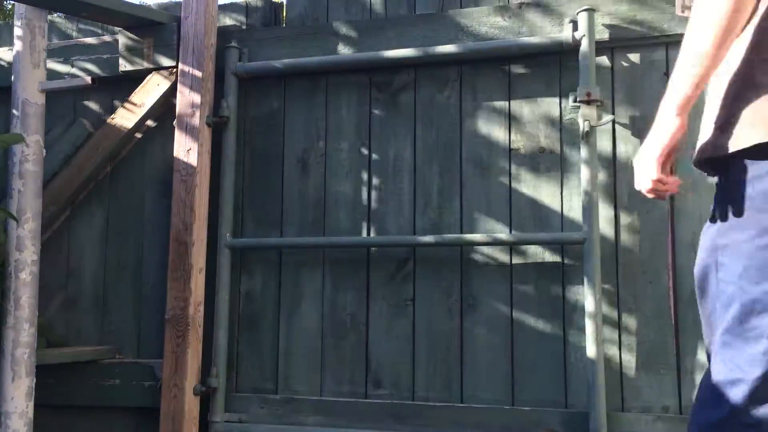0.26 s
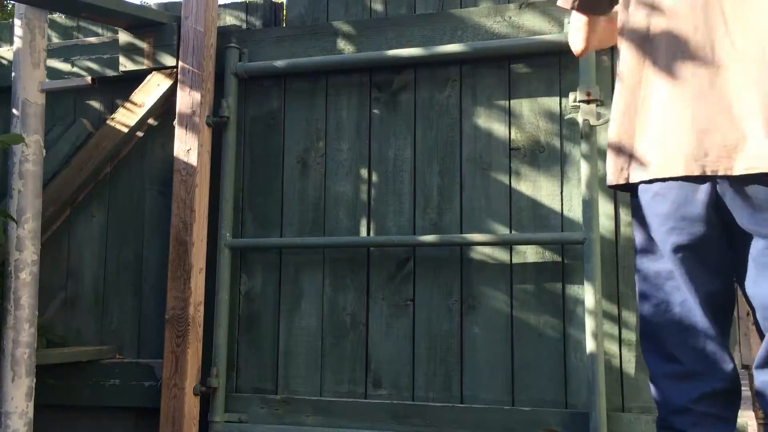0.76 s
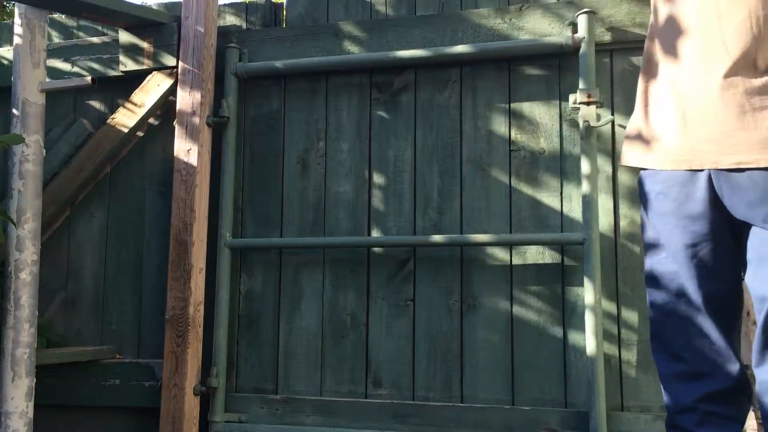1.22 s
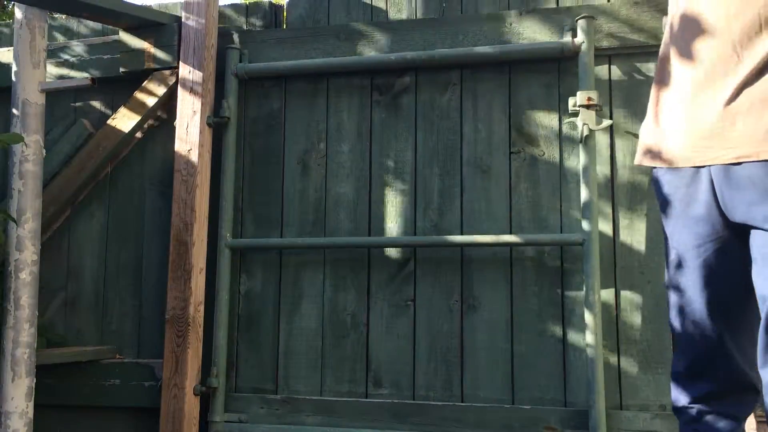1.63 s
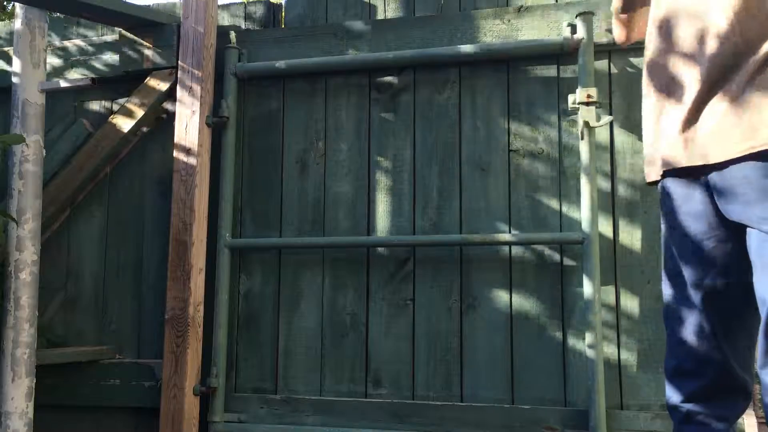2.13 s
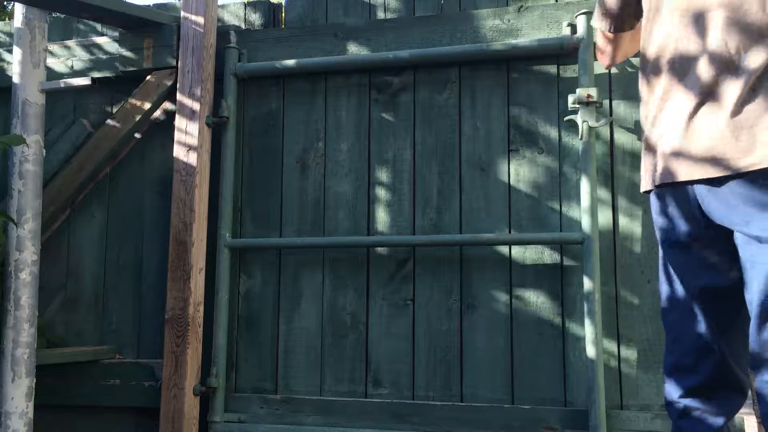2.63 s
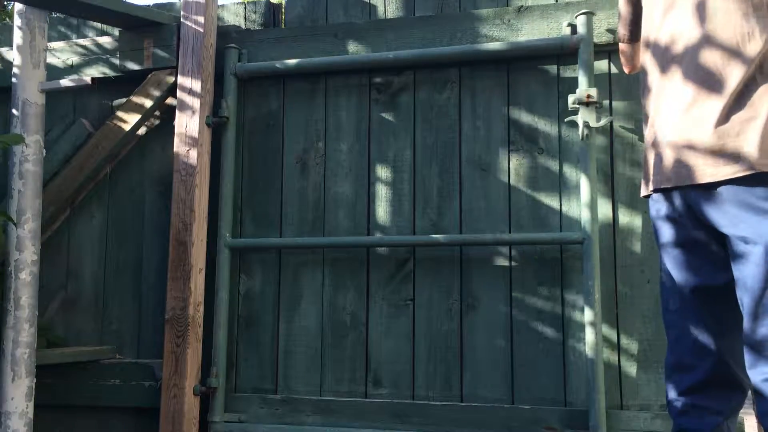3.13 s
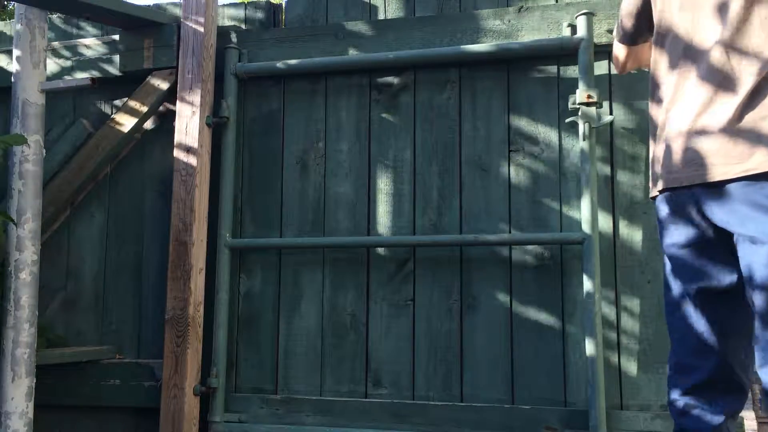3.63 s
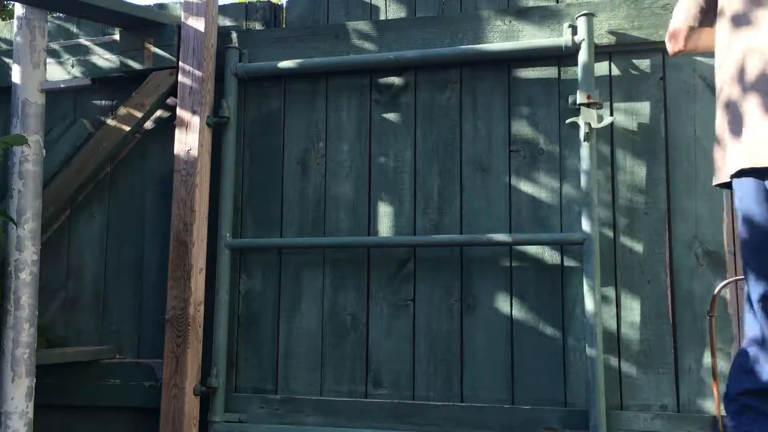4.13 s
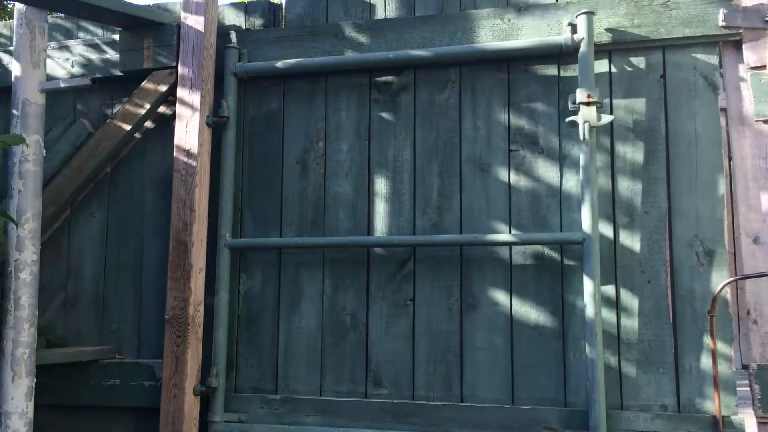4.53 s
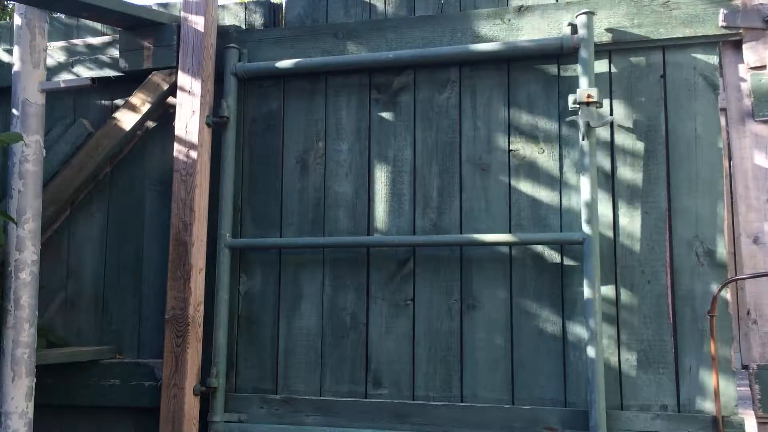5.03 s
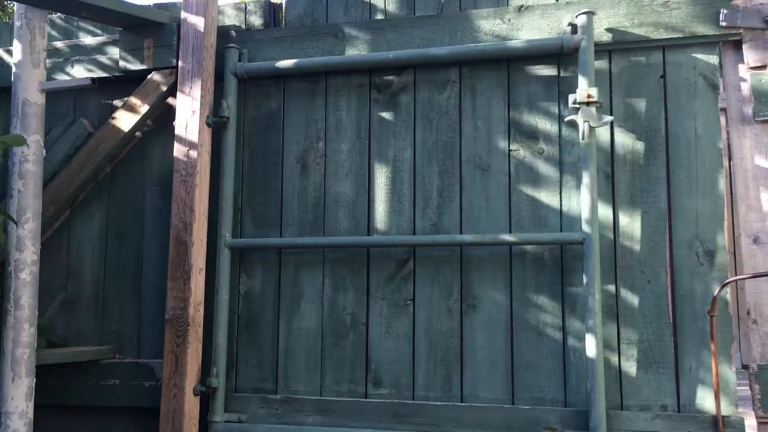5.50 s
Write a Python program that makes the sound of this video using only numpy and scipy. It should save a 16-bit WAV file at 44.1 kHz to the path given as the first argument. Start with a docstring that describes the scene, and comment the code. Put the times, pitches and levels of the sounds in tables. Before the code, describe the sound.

Metal latch parts clank and ring while a tube-framed wooden gate knocks, scrapes and squeaks in bursts, over faint distant traffic hum.

```python
"""First a low far hum and a soft thud, then a faint hinge squeak and a gathering run of knocks.
Outdoors in a fenced yard, a wooden gate on a steel tube frame is handled: shaped noise makes its knocks,
scrapes, screech and thuds; decaying sines ring its latch bar and catch plate until a touch damps them;
wavering harmonic tones squeak. The fences answer; far traffic and leaves hum behind, and a faint far
bird whistles near the end. The microphone chain rolls off both ends of the range."""
import sys
import numpy as np
from scipy import signal
from scipy.fft import rfft, irfft
from scipy.io import wavfile
from scipy.ndimage import map_coordinates

SR = 44100
rng = np.random.default_rng(int(sys.argv[2]) if len(sys.argv) > 2 else 0)


def master_out(mix):
    """Clip the mix to full scale and print it as 16-bit PCM to the path in sys.argv[1]."""
    frames = np.transpose(np.atleast_2d(mix))
    ceiling = np.clip(frames, -1, 1)
    pcm = np.round(ceiling * 32767).astype(np.int16)
    wavfile.write(sys.argv[1], SR, pcm)


def volts_from_decibels(level):
    """Turn decibel levels (scalar or array-like) into linear amplitude factors."""
    exponent = np.asarray(level, float) / 20
    return 10 ** exponent


N = 253969

# Spectra are relative shapes unless said: pitch_hz, level_db.
# Resonances: pitch_hz, width_hz, added_db (height added on top of the spectrum).

# far traffic and leaves: pitch_hz, level_db
AIR_SPECTRUM = [(15, -42), (25, -1), (70, -3.5), (166, -8), (196, -20.5), (250, -9.5), (278, -27),
                (453, -18), (491, -17), (2490, -32.5), (4170, -38), (4520, -37), (14500, -52), (16200, -39)]
AIR_DB = -48
# faint far whistle: time_s, pitch_hz, level_db
BIRD_WHISTLE = [(5.49, 3200, -85), (5.51, 3500, -72), (5.53, 4050, -69), (5.59, 4100, -71),
                (5.62, 4100, -85)]
# the fences' answer: pitch_hz, t60_s
YARD_DECAY = [(300, .35), (2000, 0.33), (10000, 0.24)]
# low boom of post and boards: pitch_hz, level_db
POST_SPECTRUM = [(24, -41), (40, -16), (56, -4), (103, -5), (189, -3.5), (233, -8.5), (269, -10.5),
                 (350, -14.5), (460, -35.5), (770, -120)]
# boards and post shaken: fullest_s, level_db, t60_s
SHAKES = [(.005, -48, 0.47), (.14, -55, .3), (.21, -33.5, 1), (.3, -36, .3), (0.339, -21.5, 0.069),
          (.4, -23.5, 0.37), (0.688, -28.5, 0.41), (1.12, -47, 0.52), (1.382, -31.5, 0.4),
          (1.53, -35.5, 0.39), (1.616, -24.5, 0.54), (1.92, -45, 0.75), (2.34, -38, 0.23),
          (2.63, -42.5, 0.4), (2.92, -32, 0.19), (3.0, -33, 0.34), (3.43, -43, .5), (3.755, -36, 0.32),
          (3.95, -46, .4), (4.06, -28.5, 0.27), (4.23, -41, 0.32), (4.38, -45.5, 1), (5.4, -38.5, 0.18),
          (5.66, -52, .9)]
THUD_RISE_DB_PER_S, RUMBLE_DB = 334, -52
# resonances of the whole gate: pitch_hz, width_hz, added_db
GATE_MODES = [(111.8, 13.4, -3), (179.2, 9.3, 1.5), (401.4, 33, 4), (461.2, 14, 4), (605, 24, -13),
              (693, 90, -9.5), (818, 39, -4), (906, 32, 4.5), (1013.6, 52, -1.5), (1113, 78, 1.5),
              (1220, 83, 7.5), (1319, 21.5, 10), (1453, 43, 2), (1566, 29, 4.5), (1695, 43, 4.5),
              (1856, 24, -4.5), (1970, 30, -9.5), (2371, 160, 10), (3037, 65, 13.5)]
# hinge squeaks: start_s, length_s, start_pitch_hz, level_db, second_harmonic_db (over the first)
HINGE_SQUEAKS = [(.085, .035, 1780, -57, -4), (.93, .055, 2260, -47, -12), (2.495, .04, 945, -43, -20),
                 (4.336, .062, 940, -32, -5), (4.39, .045, 900, -37, -14), (4.452, .04, 2070, -42, -25),
                 (4.83, .035, 915, -42, -5), (4.908, .03, 935, -36, -11), (4.94, .03, 905, -45, -14)]
SAG_HZ_PER_S = 900
# steel rubbing along the tube: time_s, level_db
SCREECH_LEVEL = [(0.2, -69), (0.245, -39.5), (0.32, -42), (0.382, -22.5), (0.4, -53), (0.43, -46),
                 (0.5, -76)]
# narrow modes of the tube: pitch_hz, width_hz, added_db
TUBE_MODES = [(3910, 45, 12), (4590, 45, 15), (5330, 45, 16), (6090, 45, 20), (6690, 45, 12),
              (6990, 55, 27), (7868, 55, 29), (8810, 45, 21), (9700, 50, 18), (10800, 45, 23),
              (11900, 45, 18), (12700, 45, 14), (13000, 60, 21), (14100, 50, 16), (15290, 45, 18)]
# catch plate set ringing: start_s, level_db (before trim), free_s until damped, most_excited_hz
CATCH_STRIKES = [(2.345, -17, 0.029, 10420), (2.606, -55, 0.027, 7770), (2.898, -16, 0.07, 10420),
                 (3.026, -38, 0.076, 7770), (3.54, -37, 0.065, 8620), (3.74, -16, 0.12, 6450),
                 (3.739, -11, 0.096, 10420), (4.139, -41, 0.18, 7360), (4.722, -50, 0.12, 7600),
                 (5.207, -58, .07, 9570)]
# modes of the catch plate: pitch_hz, level_db, t60_s
PLATE_MODES = [(6450, 0, .35), (7600, 0, .5), (7770, 0, .3), (8620, 0, .3), (9570, 0, .2), (10420, 0, .18)]
# latch bar set ringing: start_s, level_db (before trim), free_s until damped, most_excited_hz,
# loss_db_per_octave away from it
LATCH_STRIKES = [(.524, -40, 0.14, 8600, -8.5), (.695, -21.5, 0.61, 4100, 1), (1.336, -32, 0.14, 6200, 27),
                 (1.482, -12, 0.083, 2940, 44), (1.654, -11, 0.095, 6200, 3), (1.754, -17.5, 0.1, 4100, 9),
                 (1.918, -17.5, 0.22, 8000, -3.5), (2.167, -13.5, 0.15, 5000, 8),
                 (4.245, -30, 0.24, 5690, 12)]
# modes of the latch bar: pitch_hz, level_db, t60_s
LATCH_MODES = [(1325, -8, .28), (1426, -4, .3), (1976, -11, .2), (2360, -3, .1), (2935, -7, .25),
               (3955, -11, .32), (4101, -4, .85), (4237, -13, .3), (4298, 0, .17), (4823, -27, .5),
               (5690, -8, .75), (6186, -5, .38), (6438, -18, .26), (7343, -20, .25), (7916, -18, .22),
               (8622, -7, .3), (9220, -13, .18), (9990, -26, .25), (10804, -1, .24), (11120, -15, .2),
               (11460, -9, .13), (11620, -9, .15), (11890, -14, .14), (12360, -9, .1), (13380, -14, .09),
               (13790, -16, .15), (14990, -18, .2)]
# steel tube frame under contact: pitch_hz, level_db
FRAME_SPECTRUM = [(100, -57), (450, -23.5), (650, -2), (900, 5.5), (1250, 0.5), (1600, -0.5), (2000, 3.5),
                  (2600, -22.5), (8000, -104)]
# wooden boards: pitch_hz, level_db
BOARD_SPECTRUM = [(200, -21.5), (300, -0.5), (420, 4), (550, 6), (750, 1.5), (1100, -26), (4000, -87.5)]
# thin bars: pitch_hz, level_db
BAR_SPECTRUM = [(400, -85.5), (1200, -9.5), (1600, 0.5), (1900, -0.5), (2400, -5.5), (2800, -6),
                (3800, -13.5), (5500, -18), (9000, -34), (15000, -66)]
# bright steel edges: pitch_hz, level_db
EDGE_SPECTRUM = [(2060, -19.5), (3500, 2), (9140, -5), (10100, -8), (11400, -12.5), (13700, -13),
                 (15800, -20), (16200, -47)]
# Levels of knocks and clanks are nominal: contacts() trims each layer.
# the frame struck: start_s, frame_level_db, boards_over_frame_db, edge_over_frame_db, frame_t60_s
FRAME_KNOCKS = [(0.087, -48.5, -17, -14, 0.49), (0.196, -30.5, -0.5, -24, 0.27),
                (.216, -28.5, -9, -19, 0.35), (0.283, -22, -8, -8, 0.15), (0.326, -15.5, -6.5, -11, 0.25),
                (.35, -21.5, -7, -21, .23), (0.692, -16.5, -20, -9.5, 0.15), (1.214, -35.5, -19, -34, .067),
                (1.256, -35.5, -28, -37, 0.1), (1.302, -33, -24, -39, 0.19), (1.557, -23.5, -4, -16, 0.094),
                (1.613, -15.5, -2.5, -27, .075), (1.754, -11, -22, -8.5, 0.16),
                (1.864, -23.5, -13, -17, 0.15), (2.3, -9.5, -16, -19.5, .16), (2.336, -11, -39, -20, 0.16),
                (2.605, -30, -1.5, -13, 0.21), (2.702, -38.5, -3, -21.5, 0.26),
                (2.806, -27.5, -4, -22, 0.12), (2.854, -30, -6, -23, 0.19), (2.896, -6.5, -10, -14, 0.077),
                (2.971, -12, -8.5, -26, 0.13), (3.024, -9, -20, -17.5, 0.089),
                (3.265, -22.5, -21, -16.5, 0.16), (3.309, -12.5, -12, -17.5, 0.11),
                (3.332, -15.5, -16, -18, 0.37), (3.404, -13, -12, -27, 0.13), (3.516, -16, -16, -32, 0.062),
                (3.537, -17.5, -12, -24, .2), (3.607, -21.5, -20.5, -23, 0.17),
                (3.641, -22, -5.5, -35, 0.053), (3.709, -23, -25.5, -14.5, 0.25),
                (3.735, -13.5, -15.5, -6.5, 0.093), (3.742, -16, -17.5, -11, 0.28),
                (3.813, -17.5, -16, -7.5, 0.066), (3.851, -16.5, -21, -19, 0.054),
                (3.919, -32.5, -23, -20, 0.092), (3.934, -19, -10.5, -39, .16),
                (4.036, -11.5, -4.5, -34.5, 0.078), (4.139, -26, -8, -15.5, 0.14),
                (4.556, -17.5, -19, -41, 0.049), (4.661, -45, -23, -20, .092),
                (4.72, -26.5, -14.5, -15, 0.15), (5.317, -25.5, -10, -9.5, 0.061),
                (5.357, -30.5, -0.5, -3, 0.06), (5.39, -32, -1.5, -20, 0.088),
                (5.641, -43.5, -11, -25, .17)]
BARS_OVER_FRAME_DB, BARS_FOLLOW_EDGE = -8, 0.21  # a brighter knock wakes the thin bars more
# the thin bars struck: start_s, bars_level_db, frame_over_bars_db, edge_over_bars_db, frame_t60_s
BAR_CLANKS = [(0.252, -31, 4, -3.5, 0.086), (0.418, -25, -16, -5.5, 0.09), (0.516, -25.5, 2, -27, 0.097),
              (.526, -33, -2, -3.5, 0.11), (1.336, -26, 1, -8.5, 0.097), (1.398, -28, -11, -17, .29),
              (1.485, -25.5, -3, -21, 0.067), (1.519, -28, -5, -16, 0.21), (1.65, -16.5, -7, -12, 0.089),
              (1.658, -15.5, -3, -1.3, .12), (1.916, -22.5, 2, 2.5, 0.19), (2.146, -22, -10, -12, 0.26),
              (2.167, -17.5, -2.5, -9.5, 0.13), (2.257, -29, -15, -25, .06), (2.366, -19.5, 3, -8.5, 0.032),
              (4.24, -27.5, -3, -19, 0.17), (4.392, -34.5, 5, -40, 0.12), (5.012, -48, 1, -6, 0.045),
              (5.206, -37, 1, -6.5, 0.1)]
BOARDS_OVER_BARS_DB = -18.5
# tiny dry clicks: start_s, level_db (before trim)
DRY_TICKS = [(0.636, -33.5), (0.948, -40), (1.0037, -37.5), (1.5287, -24), (2.5905, -55), (4.834, -41),
             (5.1344, -50), (5.499, -42)]
# a bar slides in before it lands: start_s, landing_s, frame_level_db, bars_level_db, edge_level_db
BAR_SLIDES = [(0.511, 0.533, -33, -25, -55), (0.652, 0.686, -38.5, -35, -45),
              (1.735, 1.753, -29.5, -26.5, -36), (1.906, 1.918, -25, -22, -53),
              (3.254, 3.267, -26, -43, -39), (4.024, 4.04, -23, -38, -60), (4.233, 4.255, -29.5, -33, -59)]
# dragging strokes: start_s, hardest_s, end_s, frame_level_db, edge_over_frame_db
DRAG_STROKES = [(.2, 0.402, 0.42, -33, -10), (1.34, 1.378, 1.524, -29.5, -25), (1.39, 1.52, 1.72, -31, -22),
                (2.156, 2.257, 2.34, -29.5, -29), (3.302, 3.37, 3.33, -36, -7),
                (3.48, 3.568, 3.74, -55, -13), (3.73, 3.81, 4.15, -44.5, -6), (4.15, 4.25, 4.4, -55, -7.5),
                (5.276, 5.359, 5.54, -47.5, 1)]
STROKE_ENDS_DB = -32  # either end of a stroke against its hardest moment
# microphone chain, absolute gain: pitch_hz, gain_db
MICROPHONE = [(25, -10), (55, -1), (15200, 1), (15600, -17), (16300, -16), (16600, -78)]


def unit(x):
    """x at rms 1."""
    return x / np.sqrt(np.mean(x ** 2) + 1e-20)


def along(points, hz):
    """Reads a (pitch_hz, value) table on a log pitch axis."""
    f, v = np.transpose(points)
    return np.interp(np.log(hz + 1), np.log(f + 1), v)


def gains(rows):
    """A gain per sample for each dB column, silent outside the table."""
    s, *cols = np.transpose(rows)
    t = np.arange(N) / SR
    return np.array([volts_from_decibels(np.interp(t, s, c, -150, -150)) for c in cols])


def wobble(rate):
    """A smooth random curve, rate knots a second."""
    knots = rng.standard_normal(int(N * rate / SR) + 4)
    return map_coordinates(knots, [np.arange(N) * rate / SR])


def coloured(x, spectrum, peaks=(), keep_level=False):
    """x through a causal minimum-phase filter, of unit energy unless keep_level: spectrum plus resonances."""
    f = np.fft.rfftfreq(16384, 1 / SR)
    lift = sum(volts_from_decibels(db) / (1 + (2 * (f - centre) / width) ** 2) for centre, width, db in peaks)
    magnitude = volts_from_decibels(along(spectrum, f)) * (1 + lift)
    cepstrum = irfft(np.log(np.maximum(magnitude, 1e-5)))
    cepstrum[1:len(f) - 1] *= 2  # folding the cepstrum makes the phase minimal
    cepstrum[len(f):] = 0
    response = irfft(np.exp(rfft(cepstrum)))[:len(f)]
    if not keep_level:
        response = response / np.linalg.norm(response)
    return signal.fftconvolve(x, response)[:N]


def grit(spiky):
    """Many tiny contacts: noise whose size changes every few milliseconds."""
    return unit(rng.standard_normal(N) * volts_from_decibels(spiky * wobble(350)))


def air():
    """Far traffic and leaves: shaped noise, slowly wavering in level."""
    level_db = AIR_DB + wobble(1.92) + 1.8 * wobble(6.9)
    return volts_from_decibels(level_db) * coloured(rng.standard_normal(N), AIR_SPECTRUM)


def bird():
    """A faint far whistle, one trembling sine that rises then holds."""
    s, hz, db = np.transpose(BIRD_WHISTLE)
    pitch_hz = np.interp(np.arange(N) / SR, s, hz) + 40 * wobble(150)
    phase = 2 * np.pi * np.cumsum(pitch_hz) / SR
    level = gains(np.transpose([s, db]))[0] * volts_from_decibels(4 * wobble(80))
    return level * np.sin(phase)


def yard(x):
    """The fences answer with a noise tail, each frequency dying at its own speed."""
    hz, t, z = signal.stft(rng.standard_normal(SR // 2), SR, nperseg=256)
    decay = volts_from_decibels(-60 * t / along(YARD_DECAY, hz)[:, None])
    tail = signal.istft(z * decay, SR, nperseg=256)[1]
    late = np.pad(x, (300, 0))  # the answer waits 300 samples
    return signal.fftconvolve(late, tail / np.linalg.norm(tail))[:N]


def thuds():
    """Low booms of the shaken gate, swelling fast and dying away, over a steady far rumble."""
    t = np.arange(0, N, 32) / SR
    power = volts_from_decibels(RUMBLE_DB) ** 2
    for fullest, db, t60 in SHAKES:
        fall_db = np.maximum(THUD_RISE_DB_PER_S * (fullest - t), 60 * (t - fullest) / t60)
        power = power + volts_from_decibels(db - fall_db) ** 2
    shake = np.interp(np.arange(N) / SR, t, np.sqrt(power))
    return coloured(shake * grit(1.3), POST_SPECTRUM, GATE_MODES)


def hinge():
    """Stick-slip tones of four harmonics, sagging in pitch and wavering in pitch and size."""
    out, shake, flutter = np.zeros(N), wobble(250), wobble(200)
    for s, length, start_hz, db, second_db in HINGE_SQUEAKS:
        at = slice(round(s * SR), round((s + length) * SR))
        sagging_hz = np.linspace(start_hz, start_hz - SAG_HZ_PER_S * length, len(out[at]))
        phase = 2 * np.pi * np.cumsum(sagging_hz * (1 + .025 * shake[at])) / SR
        overtones = np.sin(2 * phase) + .08 * np.sin(3 * phase) + .08 * np.sin(4 * phase)
        tone = np.sin(phase) + volts_from_decibels(second_db) * overtones
        out[at] += volts_from_decibels(db + 1.8 * flutter[at]) * np.sqrt(np.hanning(len(phase))) * tone
    return out


def screech():
    """Steel rubbing keeps the tube's narrow modes alight."""
    rub = gains(SCREECH_LEVEL)[0] * grit(3)
    return coloured(rub, [(2500, -25.0), (3500, 7.0), (16000, -8.5)], TUBE_MODES)


def rung(events, modes, spread_db):
    """Each blow favours the modes near its most excited pitch; they ring until a touch stops them."""
    out, t = np.zeros(N + SR), np.arange(SR // 2) / SR
    hz, level_db, t60 = np.transpose(modes)[:, :, None]
    luck = rng.standard_normal((len(events), 2, len(modes), 1))
    for (s, db, free, best_hz, slope_db), (size, phase) in zip(events, luck):
        nearest = hz[np.argmin(abs(hz - best_hz))]
        start_db = level_db + spread_db * size - slope_db * abs(np.log2(hz / nearest))
        partials = volts_from_decibels(start_db - 60 * t / t60) * np.sin(2 * np.pi * hz * t + 9 * phase)
        damping_db = 60 * np.maximum(t - free, 0) / 0.025
        swell = 1 - np.exp(-t / 0.0016)
        out[round(s * SR):][:len(t)] += volts_from_decibels(db - 14.5 - damping_db) * swell * partials.sum(axis=0)
    return out[:N]


def catch_plate():
    """The struck plate rings mostly in one mode, losing 90 dB per octave away from it."""
    return rung([(*row, 90) for row in CATCH_STRIKES], PLATE_MODES, spread_db=1)


def latch_bar():
    """The free bar rings in many modes until damped."""
    return rung(LATCH_STRIKES, LATCH_MODES, spread_db=2)


def small_modes(low_hz, high_hz, width_hz, count):
    """A random crowd of short modes of rails, bolts and brackets: pitch_hz, width_hz, added_db."""
    luck = rng.random((count, 2))
    return [(low_hz + (high_hz - low_hz) * a, width_hz, 11 * b) for a, b in luck]


def placed(force, spectrum, band, shared=(), count=5):
    """The contact cycles over several places, each adding its own small modes to the shared ones."""
    place = (np.arange(N) // (SR // 8)) % count  # an eighth of a second at each
    out = np.zeros(N)
    for k in range(count):
        modes = [*shared, *small_modes(*band, count=40)]
        out += coloured(force * (place == k), spectrum, modes)
    return out


def blows():
    """Knocks and clanks as rows: start_s, nominal frame, boards, bars and edge db, frame_t60_s."""
    rows = []
    for s, db, boards, edge, t60 in FRAME_KNOCKS:
        bars_db = db + BARS_OVER_FRAME_DB + BARS_FOLLOW_EDGE * edge
        rows.append((s, db, db + boards, bars_db, db + edge, t60))
    for s, db, frame, edge, t60 in BAR_CLANKS:
        rows.append((s, db + frame, db + BOARDS_OVER_BARS_DB, db, db + edge, t60))
    return rows


def contacts():
    """Knocks, clicks, slides and drags drive the frame, boards, thin bars and bright steel edges."""
    power, t = np.zeros((4, N + SR)), np.arange(SR // 2) / SR  # rows: frame, boards, bars, edge
    swell = 1 - np.exp(-t / np.array([[.0015], [.003], [.002], [.0012]]))  # the edge rises first
    for s, *levels_db, t60 in blows():
        life = t60 * np.array([[1], [1.1], [.9], [.7]])  # and dies first
        start_db = np.array(levels_db)[:, None] + np.array([[-5.0], [1.0], [0], [1.5]])
        power[:, round(s * SR):][:, :len(t)] += (volts_from_decibels(start_db - 60 * t / life) * swell) ** 2
    for s, db in DRY_TICKS:  # bars and edge only
        power[2:, round(s * SR):][:, :len(t)] += volts_from_decibels(db - 7.5 - 60 * t / 0.014) ** 2
    for start, landing, *levels_db in BAR_SLIDES:
        at = slice(round(start * SR), round(landing * SR))
        growth = np.linspace(.1, 1, at.stop - at.start)
        power[[0, 2, 3], at] += (volts_from_decibels(levels_db)[:, None] * growth) ** 2
    for start, hardest, end, db, edge_db in DRAG_STROKES:
        # 0 at the hardest moment, 1 at the ends, 9 (silent) outside
        away = np.interp(np.arange(N) / SR, [start, hardest, end], [1, 0, 1], 9, 9)
        shares = np.array([[1], [.35], [.45], [volts_from_decibels(edge_db)]])  # of amplitude, against the frame
        power[:, :N] += (volts_from_decibels(db + STROKE_ENDS_DB * away ** 1.34) * shares) ** 2
    frame, boards, bars, edge = np.sqrt(power[:, :N])
    rails, steel = (600, 6000, 30), (3000, 15500, 45)  # small modes: low_hz, high_hz, width_hz
    return (placed(frame * grit(2.56), FRAME_SPECTRUM, rails, GATE_MODES)
            + coloured(boards * grit(1.6), BOARD_SPECTRUM, GATE_MODES)
            + placed(bars * grit(3.4), BAR_SPECTRUM, rails, GATE_MODES)
            + placed(edge * grit(3.85), EDGE_SPECTRUM, steel))


def scene():
    """Gate sounds, the fences' answer and the far background."""
    gate = contacts() + hinge() + screech()
    steel = latch_bar() + catch_plate()
    answer = volts_from_decibels(-11.0) * yard(gate + .5 * steel)
    return (gate + steel + answer + thuds() + bird() + air())[None]


def top_cut(x):
    """Nothing passes above the cut-off."""
    return signal.sosfilt(signal.butter(12, 16300, fs=SR, output="sos"), x)


def record(dry):
    """The microphone chain rolls off both ends of the range."""
    mix = coloured(dry[0], MICROPHONE, keep_level=True)[None]
    return top_cut(mix)


dry = scene()
out = record(dry)
master_out(out)
```